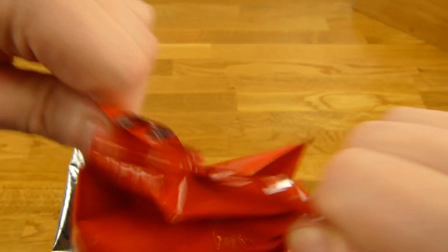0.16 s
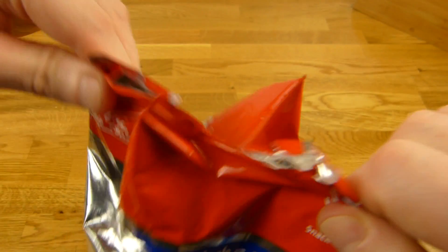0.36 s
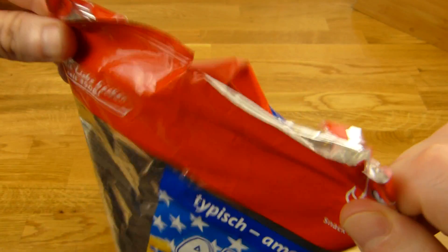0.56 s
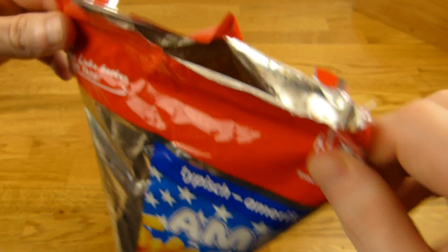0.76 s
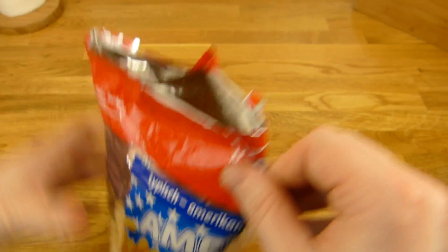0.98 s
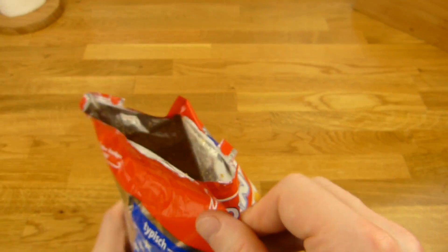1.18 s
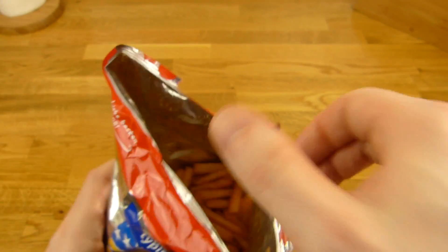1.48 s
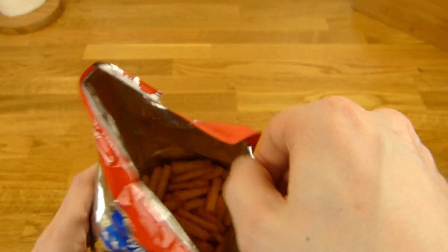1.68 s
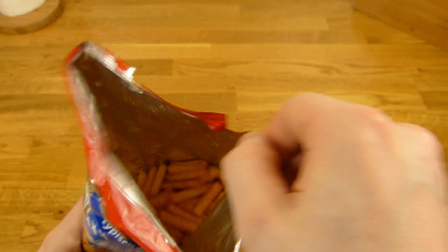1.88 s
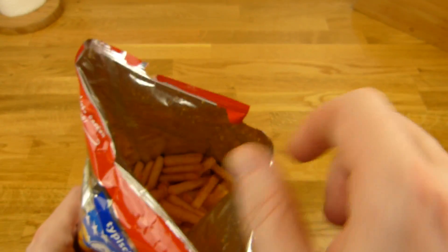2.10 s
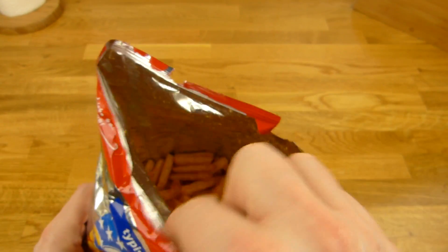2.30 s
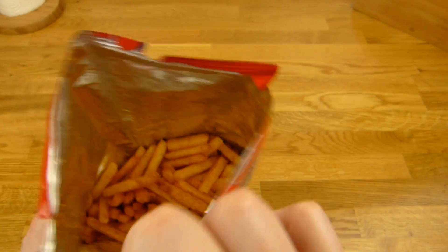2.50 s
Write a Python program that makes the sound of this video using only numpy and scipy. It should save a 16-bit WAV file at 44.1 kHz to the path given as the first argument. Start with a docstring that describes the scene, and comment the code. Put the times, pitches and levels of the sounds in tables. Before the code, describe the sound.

A stiff metallised plastic snack bag crackles loudly as hands pull it open, with dense sharp snaps and small thuds from 0 to 0.7 s. Crinkling thins to scattered ticks until about 1.3 s, the mouth opening near 0.95 s. Slacker, slightly hollow rustling bursts follow from 1.3 to 2.2 s, a brief lull near 2.3 s, then crisp crackles to the end. Close, bright, small room, faint room noise.

```python
"""A sharp tick of stiff film over a dense crackle: two hands pull open a metallised plastic snack bag,
above a wooden table and close to the microphone. Creases snap as short pulses with a shiver and a thud;
crumpling scatters random clicks over patches of film; small facets plop as gliding, fading sines.
Resonances give the wall's low note and the hollow air of the bag, stronger once it is open.
One bounce from the table, a short tail of a small room and faint room noise lie behind."""
import sys
import numpy as np
from scipy import signal
from scipy.fft import rfft, irfft
from scipy.io import wavfile

SR = 44100
rng = np.random.default_rng(int(sys.argv[2]) if len(sys.argv) > 2 else 0)


def wav_record(signal):
    """Record a signal, one row per channel, as 16-bit PCM in the file named by sys.argv[1]."""
    frames = np.transpose(np.atleast_2d(signal))
    bounded = np.clip(frames, -1, 1)
    # unit amplitude maps onto the largest positive 16-bit level
    quanta = np.round(bounded * 32767).astype(np.int16)
    wavfile.write(sys.argv[1], SR, quanta)


N = 116865
TAPS = 2048  # length of the short responses, samples


def amp(db):
    """Decibels to gain."""
    return 10 ** (np.asarray(db) / 20)


def unit(x):
    """Scales to an energy of one."""
    return x / np.sqrt(np.sum(x ** 2) + 1e-20)


def read(points, hz):
    """Reads a table on a log-frequency axis."""
    f, value = np.transpose(points)
    return np.interp(np.log(hz + 1), np.log(f + 1), value)


def add(mix, s, sound):
    """Mixes a sound in at a time in seconds, cut at the end of the scene."""
    part = mix[:, round(s * SR):][:, :sound.shape[1]]
    part += sound[:, :part.shape[1]]


def convolve(x, response):
    """Convolves rows, no longer than the scene."""
    return signal.fftconvolve(np.atleast_2d(x), np.atleast_2d(response), axes=1)[:, :N]


def tinted(x, points, share=1):
    """Applies a share of a table of f/Hz, level/dB to a sound."""
    hz = np.fft.rfftfreq(2 * N, 1 / SR)
    return irfft(rfft(x, 2 * N) * amp(share * read(points, hz)))[..., :N]


def resonate(x, hz, width, db):
    """One fixed resonance."""
    b, a = signal.iirpeak(hz, hz / width, SR)
    return amp(db) * signal.lfilter(b, a, x)


def tick(colour_db):
    """The shortest causal (minimum-phase) pulse with a colour given as a function of Hz."""
    hz = abs(np.fft.fftfreq(TAPS, 1 / SR))
    log_gain = np.log(amp(colour_db(hz)))
    spectrum = np.exp(np.conj(signal.hilbert(log_gain)))
    return unit(np.fft.ifft(spectrum).real)


def shiver(decay_s):
    """A short diffuse ring of the film: fading noise, as mid and side."""
    t = np.arange(TAPS) / SR
    return np.array([unit(z * np.exp(-t / decay_s)) for z in rng.standard_normal((2, TAPS))])


CRACK_S = .0002  # decay of a patch's crack


def panel(colour, decay_s, ring_db):
    """Response of one patch of film: a brief crack with a tint of its own, then its shiver, as mid and side."""
    ring = shiver(decay_s)
    ring[0] = amp(ring_db) * ring[0] + shiver(CRACK_S)[0]
    pulse = tick(lambda hz: read(colour, hz))
    return np.array([unit(row) for row in convolve(ring, pulse)])


# colour of the wall's thud and of the low rustle: f/Hz, relative level/dB
LOW_COLOUR = [(30, -65), (70, -36), (110, -23.5), (155, -15.5), (250, -15.5), (460, -9.5), (620, -8.5),
              (820, -2.5), (1450, -2.5), (1850, 0.5), (2500, -2.5), (6000, -33.5)]
LOW_SHIVER_S, LOW_SHIVER_DB = .004, 2  # decay and level of the low ring
# colour laid over every tick: f/Hz, relative level/dB
TICK_TOP = [(50, -53), (200, -24), (700, -43), (2000, -4), (8500, 1.5), (11000, -6), (14000, -10),
            (16500, -28)]
TICK_OCTAVES, TICK_SKIRT_DB = .38, -14  # spread of the tick around its pitch, floor under it
LAG_S = .0006  # longest lag of the bass along the film
AFTER_DB, AFTER_S, AFTER_PER_S = -4, .0021, 6000  # flurry of small buckles: level, decay, rate
AFTER_LAG_S = 0.00051  # the flurry swells from here
THUD_DB = -3  # added to every thud


def snap(level_db, pitch_hz, thud_db):
    """A crease flips: a sharp crack whose bass arrives late, a flurry of small buckles, and a thud of the wall."""
    def colour(hz):
        hump = np.exp(-.5 * (np.log2((hz + 1) / pitch_hz) / TICK_OCTAVES) ** 2)
        return 20 * np.log10(hump + amp(TICK_SKIRT_DB)) + read(TICK_TOP, hz)
    hz, t = np.fft.rfftfreq(TAPS, 1 / SR), np.arange(TAPS) / SR
    lag = LAG_S * np.exp(-hz / pitch_hz)
    turns = np.cumsum(lag) * SR / TAPS  # phase that delays each frequency by its lag
    pulse = irfft(rfft(tick(colour)) * np.exp(-2j * np.pi * turns))
    crack = shiver(2 * CRACK_S)[0]
    crack[0] = 1
    buckles = rng.random(TAPS) < AFTER_PER_S / SR
    flurry = shiver(AFTER_S) * np.maximum(t - AFTER_LAG_S, 0) * buckles
    sound = np.array([unit(row) for row in convolve(flurry, pulse)])
    sound[0] = amp(AFTER_DB) * sound[0] + unit(convolve(crack, pulse)[0])
    thud = panel(LOW_COLOUR, LOW_SHIVER_S, LOW_SHIVER_DB)
    return amp(level_db) * sound + amp(thud_db + THUD_DB) * thud


# big creases snapping through: t/s, level/dB, pitch f/Hz, thud level/dB before THUD_DB
CREASE_SNAPS = [(0.0091, 2.5, 5950, -22), (0.051, -2.5, 4700, -10), (0.1374, -2, 7600, -9.5),
                (0.1628, 3.5, 4950, -4), (0.1711, 6, 5100, -22), (0.1888, 7, 7500, -2.5),
                (0.2092, -10, 5200, -4.5), (0.233, 6.5, 4430, 0.5), (0.2515, 5.5, 6200, -29),
                (0.2792, -4, 4600, -16), (0.3193, -5, 7200, -24), (0.3905, -5, 6500, -28),
                (0.423, 2, 6600, -3), (0.4269, 2.5, 3700, -2), (0.4606, 3, 7100, -2.5),
                (0.4674, -1, 6840, -22), (0.4893, -10, 5600, -3.5), (0.5174, 3, 5560, -8),
                (0.5257, 0, 5250, -28), (0.5439, -5, 5530, -12), (0.5868, 7.5, 6400, -3.5),
                (0.6252, 1, 5940, -2.5), (0.6737, -6.5, 6760, -5), (0.6893, 8, 6900, -28),
                (0.6926, 0, 7700, -25), (0.7684, -7.5, 5540, -15.5), (0.7946, -16, 5800, -15.5),
                (0.835, -7.5, 5800, -15.5), (0.8588, -8, 6630, -29), (0.8704, -5, 5700, -14),
                (0.9063, 1, 6840, -9), (0.9672, -10, 6540, -34), (0.9777, 0, 6140, -29),
                (0.9814, -1, 5840, -16), (1.081, -11, 6840, -25), (1.0956, -13.5, 4640, -12),
                (1.1394, -4, 5030, -27), (1.1878, -7.5, 7750, -8), (1.2218, -11, 6000, -17),
                (1.2679, -14, 3630, -10), (1.3871, -4, 5400, -16), (1.4584, 0, 6440, -2.5),
                (1.572, -6.5, 6600, -23), (1.6181, -11, 6000, -14.5), (1.7075, -5.5, 4440, -13),
                (1.7558, -15, 5100, -13), (1.8027, -1, 5040, -2), (1.9374, -2, 5800, -10),
                (2.044, -3.5, 5500, -4), (2.0777, -6, 6000, -7.5), (2.0983, 0.5, 5500, -4),
                (2.172, -1, 5100, -7.5), (2.2954, -14.5, 4650, -16), (2.3216, -17.5, 6230, -19),
                (2.405, -11, 4950, -9), (2.4295, -17, 5100, -22), (2.4392, 0.5, 6660, -18),
                (2.4821, 2.5, 5400, -9), (2.4869, 0, 5000, -1), (2.587, -4.5, 6000, -13),
                (2.6057, 2, 5100, -13), (2.6267, -6, 5560, -10.5)]


def snaps():
    """The stiff creases snap through one by one, as mid and side."""
    out = np.zeros((2, N))
    for start, level_db, pitch_hz, thud_db in CREASE_SNAPS:
        add(out, start, snap(level_db, pitch_hz, thud_db))
    return out


CATCH = 1.3  # above 1, the film holds and then gives way suddenly


def gives_way(times, level):
    """Follows a level curve; the film holds, so each rise comes late and steeply."""
    place = np.interp(np.arange(N) / SR, times, np.arange(len(times)))
    k = np.minimum(place.astype(int), len(times) - 2)
    step, part = np.diff(level)[k], place - k
    return level[k] + step * np.where(step > 0, part ** CATCH, part)


OPENS_S, OPEN_S = 0.93, 0.98  # the mouth starts to open, and is open


def as_it_opens(shut, opened):
    """Moves a value in a straight line from the shut bag to the open one."""
    return np.interp(np.arange(N) / SR, [OPENS_S, OPEN_S], [shut, opened])


# crumpling of the film: t/s, then treble, middle and low rustle level/dB, before the range gains
CRUMPLE = [(0.0, -31, -23.5, -35.5), (0.016, -20.5, -27, -37.5), (0.037, -33.5, -40, -40.5),
           (0.049, -19, -19, -29.5), (0.107, -42, -53, -45.5), (0.14, -19, -23, -33),
           (0.166, -24, -40, -36.5), (0.191, -16, -21, -25), (0.234, -17.5, -20, -27.5),
           (0.259, -25, -31, -35.5), (0.289, -19.5, -20.5, -28), (0.301, -28, -33, -36.5),
           (0.328, -23, -30, -27), (0.339, -33, -35, -42), (0.38, -21, -29, -33), (0.415, -33, -34, -40),
           (0.431, -24, -33, -40), (0.453, -31, -35, -35), (0.465, -21.5, -32, -38),
           (0.494, -28.5, -25.5, -29.5), (0.549, -25.5, -30.5, -35), (0.579, -29.5, -40, -34),
           (0.591, -26.5, -28, -39), (0.616, -29, -35, -36), (0.624, -20.5, -27, -32.5),
           (0.667, -27.5, -33.5, -33.5), (0.685, -17, -28, -24.5), (0.695, -42, -46, -61),
           (0.763, -39, -51, -60), (0.772, -35.5, -38, -42.5), (0.848, -42, -44, -45),
           (0.874, -26, -38, -43), (0.888, -30.5, -40, -39.5), (0.913, -19, -30, -36.5),
           (0.923, -34, -43, -35.5), (0.963, -37, -40, -42), (0.979, -28.5, -37, -38),
           (1.078, -53, -46, -50), (1.098, -30, -40, -36.5), (1.133, -37, -33.5, -37),
           (1.142, -21.5, -28, -28.5), (1.263, -41.5, -46, -46), (1.27, -28.5, -30, -37.5),
           (1.299, -37, -38, -34.5), (1.334, -20, -23, -24.5), (1.362, -28, -34, -30),
           (1.388, -17.5, -23, -28), (1.437, -27, -29.5, -30.5), (1.462, -22.5, -30, -28.5),
           (1.532, -29.5, -34, -34.5), (1.576, -31, -35.5, -36), (1.605, -47.5, -44.5, -50.5),
           (1.678, -43.5, -48, -45), (1.692, -27, -33.5, -35), (1.77, -30.5, -33.5, -31),
           (1.807, -21.5, -25, -25.5), (1.857, -14, -25.5, -23.5), (1.863, -26.5, -32.5, -33),
           (1.918, -18, -23.5, -24.5), (1.951, -30, -32, -34), (1.995, -17.5, -26.5, -23.5),
           (2.085, -27, -30.5, -35.5), (2.165, -35.5, -37, -36.5), (2.175, -15, -22.5, -23),
           (2.209, -35.5, -37.5, -40.5), (2.29, -67, -58, -61), (2.299, -42, -56, -51),
           (2.36, -46, -53, -50), (2.392, -37, -44, -41), (2.413, -15, -23.5, -25.5),
           (2.425, -25.5, -32, -36.5), (2.439, -16, -18.5, -24.5), (2.456, -22, -31, -30.5),
           (2.486, -15.5, -23, -25), (2.555, -34, -37, -35.5), (2.568, -28.5, -34, -28),
           (2.597, -39, -37, -43), (2.608, -16, -31, -26), (2.65, -36.5, -32, -43)]
# colour of the tiny treble and middle buckles: f/Hz, relative level/dB
TREBLE_COLOUR = [(100, -46), (3000, -21.5), (4600, -7), (6000, -3), (7700, -2), (9000, -6.5),
                 (10500, -13.5), (12500, -21), (14500, -30.5), (16500, -66)]
MIDDLE_COLOUR = [(100, -45), (1300, -32), (1950, -1.5), (2300, -8), (2650, 7.5), (3400, 6.5), (4150, 7.5),
                 (4700, 6.5), (7000, -19)]
TREBLE_DB, MIDDLE_DB, LOW_DB = -4.5, -5.5, -4  # range gains
SHIVER_S, SHIVER_DB = .0028, 2.5  # decay and level of the treble and middle ring
BUCKLES_PER_S, BUSY_DB = 1400, -22  # rate for the shut bag at this treble level
THINNING = .5  # dB of rate per dB of treble: buckles thin out as the hands ease off
SLACK_DENSITY = 1.5  # the open, slack bag buckles this many times as often
SIZE_SPREAD_DB, RANGE_SPREAD_DB = 5.2, 3  # uneven sizes, in common and in each range
EVEN_S, PANELS = .015, 30  # window that evens the power, number of film patches


def crackle():
    """Tiny buckles of uneven size land on random patches of film, as strongly as the hands crumple it."""
    times, *levels = np.transpose(CRUMPLE)
    rate = BUCKLES_PER_S * amp(THINNING * (gives_way(times, levels[0]) - BUSY_DB))
    rate = rate * as_it_opens(1, SLACK_DENSITY)
    size = (rng.random(N) < rate / SR) * rng.choice([-1, 1], N)
    size = size * amp(SIZE_SPREAD_DB * np.minimum(rng.exponential(1, N), 3))
    patch, out = rng.integers(0, PANELS, N), np.zeros((2, N))
    window = signal.windows.hann(int(EVEN_S * SR))
    ranges = [(TREBLE_COLOUR, TREBLE_DB, SHIVER_S, SHIVER_DB),
              (MIDDLE_COLOUR, MIDDLE_DB, SHIVER_S, SHIVER_DB),
              (LOW_COLOUR, LOW_DB, LOW_SHIVER_S, LOW_SHIVER_DB)]
    for level, (colour, gain_db, decay_s, ring_db) in zip(levels, ranges):
        clicks = size * amp(RANGE_SPREAD_DB * rng.standard_normal(N))
        power = abs(signal.fftconvolve(clicks ** 2, window / window.sum(), "same"))
        clicks = clicks / np.sqrt(power + 1e-9) * amp(gives_way(times, level) + gain_db)
        for k in range(PANELS):
            out += convolve(clicks * (patch == k), panel(colour, decay_s, ring_db))
    return out


POP_DECAY_S, POP_RISE_S = .0024, .0006
POP_GLIDE, POP_SIDE_DB = .08, -5  # fall in pitch as a share of it, level of the side


def pop(level_db, pitch_hz):
    """A facet flips over and rings for a few cycles, its pitch settling as it relaxes."""
    t = np.arange(TAPS) / SR
    glide = 1 + POP_GLIDE * (np.exp(-2 * t / POP_DECAY_S) - .25)
    turns = np.cumsum(pitch_hz * glide) / SR
    envelope = amp(level_db) * (1 - np.exp(-t / POP_RISE_S)) * np.exp(-t / POP_DECAY_S)
    mid = np.sin(2 * np.pi * turns)
    side = amp(POP_SIDE_DB) * np.sin(2 * np.pi * (turns + rng.random()))
    return envelope * np.array([mid, side])


# small facets of the wall flipping: t/s, level/dB before rise and decay, f/Hz about which the pitch glides
FACET_POPS = [(0.205, -11, 2770), (0.2505, -16, 3010), (0.287, -14.5, 2030), (0.289, -20.5, 930),
              (0.44, -21.5, 850), (0.4606, -18, 2820), (0.484, -23, 1450), (0.4896, -16, 1486),
              (0.4985, -16, 857), (0.624, -16, 2470), (0.638, -20, 1880), (0.942, -30, 1050),
              (1.103, -30.5, 800), (1.316, -29, 1080), (1.460, -19, 2400), (1.5599, -29, 1270),
              (1.647, -29, 1110), (1.687, -28.5, 1240), (1.756, -27, 1140), (1.803, -17.5, 1190),
              (1.835, -16.5, 1130), (2.021, -22, 1170), (2.112, -24, 1250), (2.296, -35.5, 900),
              (2.321, -34.5, 1215), (2.464, -21, 1150), (2.590, -26.5, 775)]


def pops():
    """Small facets of the wall flip with a pitched plop, as mid and side."""
    out = np.zeros((2, N))
    for start, level_db, pitch_hz in FACET_POPS:
        add(out, start, pop(level_db, pitch_hz))
    return out


# the broad wall's own low note: f/Hz, width/Hz, gain/dB
WALL_NOTE = (391, 32, -8)


def wall(x):
    """The broad wall rings with one low note, whether the bag is shut or open."""
    return resonate(x, *WALL_NOTE)


# air modes of the open bag: f/Hz, width/Hz, gain/dB
AIR_MODES = [(150, 60, -5), (736, 52, 0.5), (823, 48, 0), (1010, 55, -1.5), (1145, 70, 1.5), (1397, 69, 1),
             (3025, 76, -3.5), (3975, 100, -1)]
SHUT_DB = -12  # drive of the air while the bag is shut


def cavity(x):
    """The air in the bag rings along, more once the mouth is open."""
    driven = x * amp(as_it_opens(SHUT_DB, 0))
    return sum(resonate(driven, *mode) for mode in AIR_MODES)


# time for the room's tail to fall by 60 dB: f/Hz, t/s
ROOM_T60 = [(150, 0.55), (1000, 0.35), (3000, 0.24), (7000, 0.39), (14000, 0.2)]
TABLE_S, TABLE_DB = .0032, -14.5  # delay and level of the bounce from the table
ROOM_DELAY_S, ROOM_DB = .006, -11


def room(x):
    """One bounce from the table, then a short diffuse tail, as mid and side."""
    hz, t, z = signal.stft(rng.standard_normal((2, SR // 2)), SR, nperseg=256)
    fade = amp(-60 * t / read(ROOM_T60, hz)[:, None])
    tails = signal.istft(z * fade, SR)[1]
    out = np.zeros((2, N))
    add(out, TABLE_S, amp(TABLE_DB) * x * np.array([[1], [-1]]))  # left and right swap
    add(out, ROOM_DELAY_S, amp(ROOM_DB) * convolve(x[0], [unit(row) for row in tails]))
    return out


# colour of the room's noise: f/Hz, relative level/dB
FLOOR_COLOUR = [(20, -14), (60, -6), (150, 3), (400, 6), (2000, -25), (16000, -58)]
FLOOR_DB = -66  # RMS of mid and of side, before the stereo tints


def room_tone():
    """Faint steady noise of the room, as mid and side."""
    noise = tinted(rng.standard_normal((2, N)), FLOOR_COLOUR)
    return np.array([amp(FLOOR_DB) * np.sqrt(N) * unit(z) for z in noise])


# how unlike the two sides are: f/Hz, gain of the side level/dB
SIDE_WIDTH = [(30, 4), (70, -7), (170, -14.5), (330, -2.5), (700, -10), (3000, -8.5), (6000, -10.5),
              (10000, -22.5), (14000, -39)]
# lean to the left, of which each channel takes a share: f/Hz, unscaled level/dB
LEFT_LEAN = [(60, -1), (250, 2.5), (700, 3.5), (1400, 1.8), (3000, 1.5), (6000, 0.5), (12000, 1)]


def scene():
    """Film, bag and room, spread to left and right."""
    film = crackle() + snaps() + pops()
    bag = film + wall(film) + cavity(film)
    mid, side = bag + room(bag) + room_tone()
    side = tinted(side, SIDE_WIDTH)
    left = tinted(mid + side, LEFT_LEAN, 0.39)
    right = tinted(mid - side, LEFT_LEAN, -0.29)
    return np.array([left, right])


CEILING, EDGE_HZ = .84, 16300  # clipping level (full scale is 1), band limit


def record(dry):
    """Peaks above the ceiling clip; then a low-pass limits the band."""
    low_pass = signal.firwin(255, EDGE_HZ, window=("kaiser", 9), fs=SR)
    clipped = np.clip(dry, -CEILING, CEILING)
    return signal.oaconvolve(clipped, low_pass[None], "same", axes=1)


dry = scene()
out = record(dry)
wav_record(out)
```